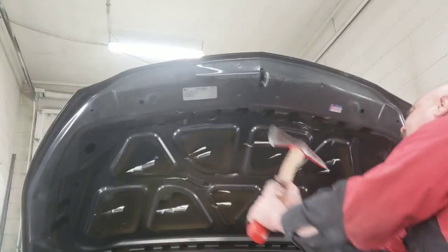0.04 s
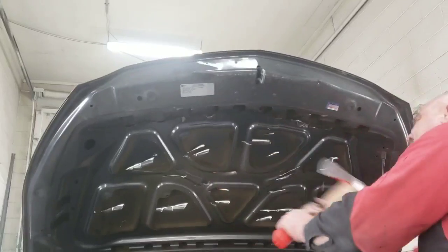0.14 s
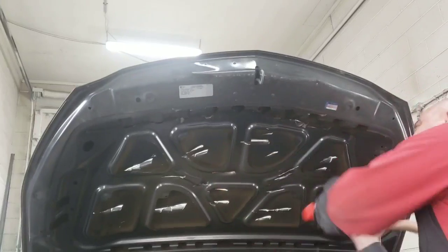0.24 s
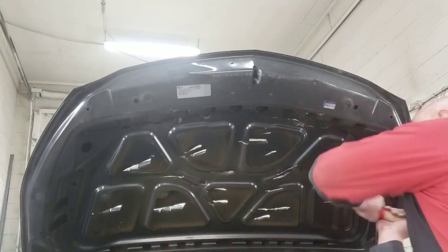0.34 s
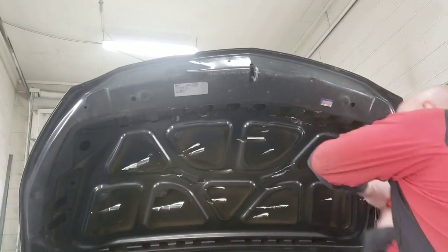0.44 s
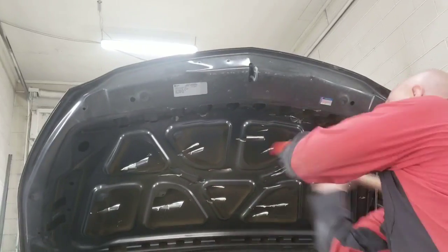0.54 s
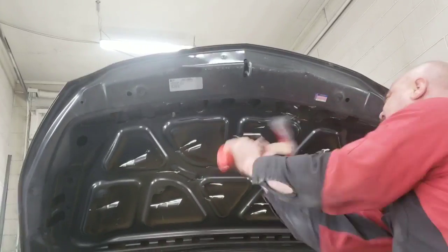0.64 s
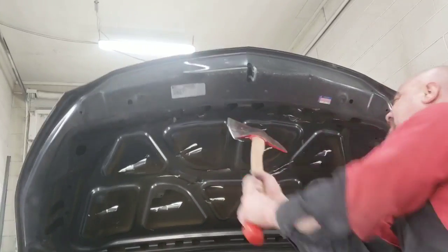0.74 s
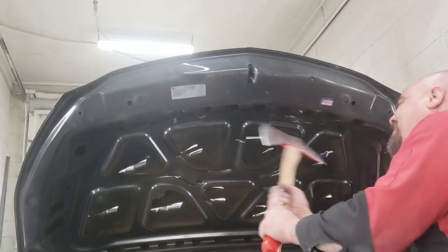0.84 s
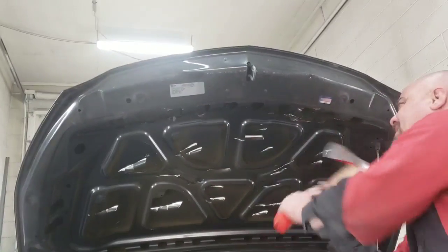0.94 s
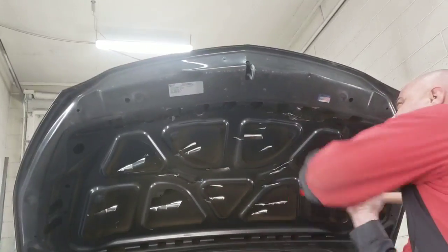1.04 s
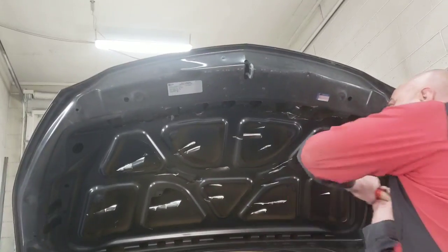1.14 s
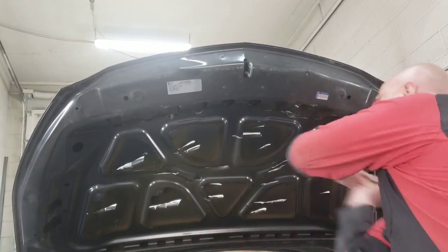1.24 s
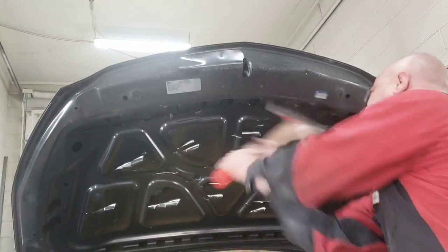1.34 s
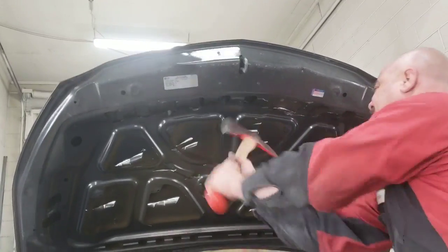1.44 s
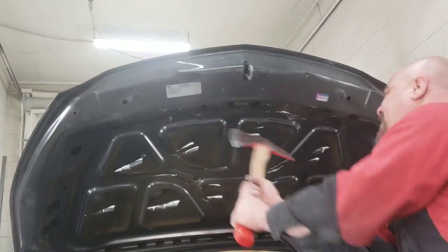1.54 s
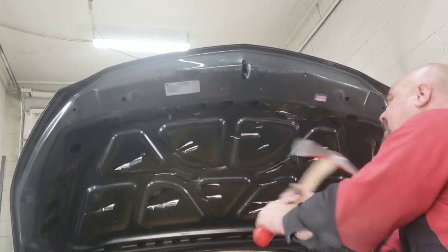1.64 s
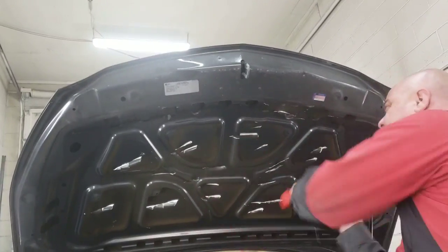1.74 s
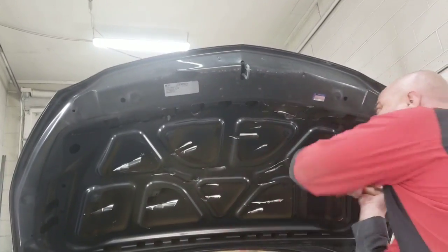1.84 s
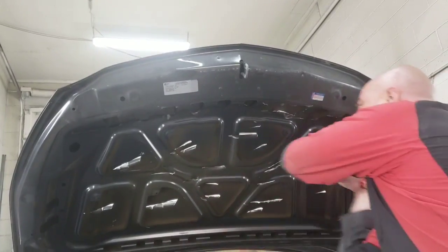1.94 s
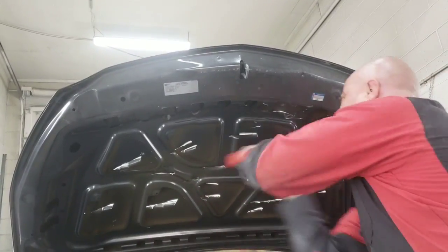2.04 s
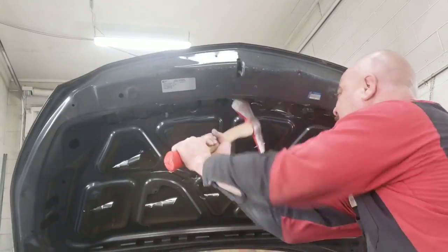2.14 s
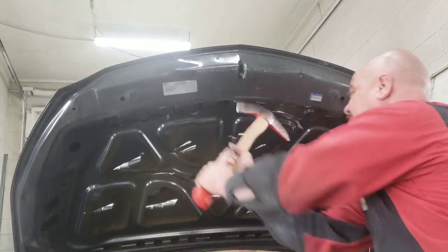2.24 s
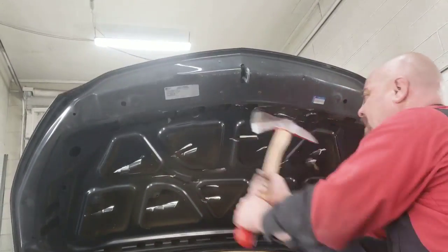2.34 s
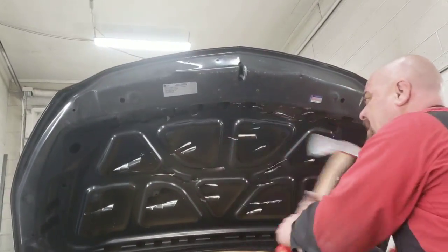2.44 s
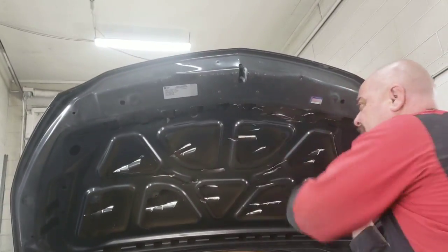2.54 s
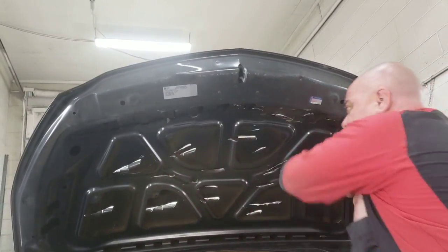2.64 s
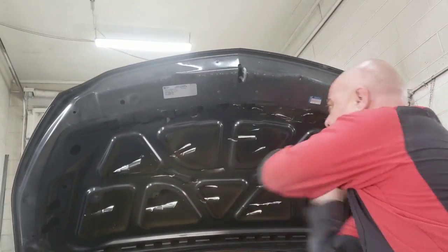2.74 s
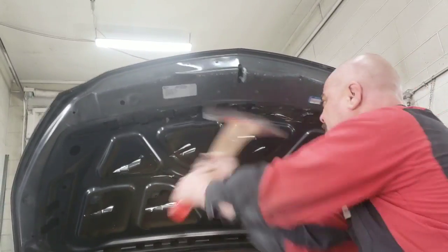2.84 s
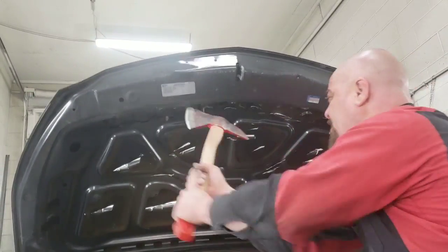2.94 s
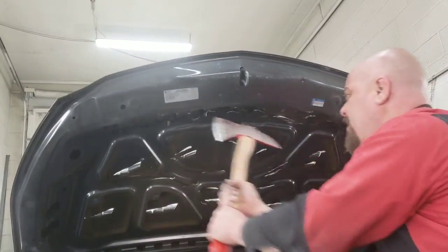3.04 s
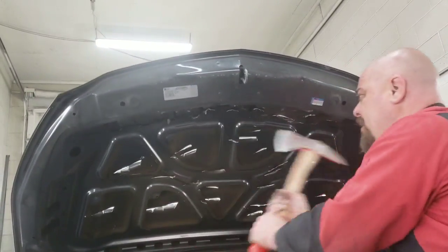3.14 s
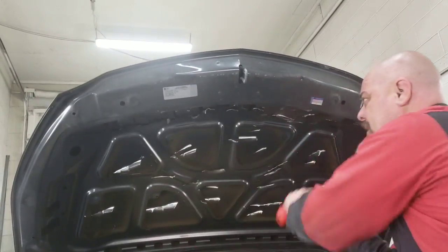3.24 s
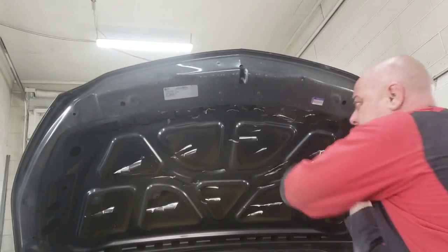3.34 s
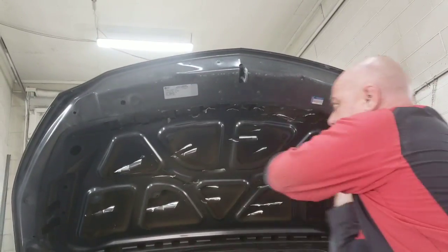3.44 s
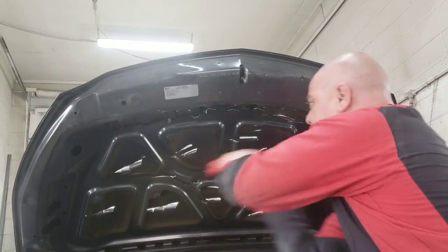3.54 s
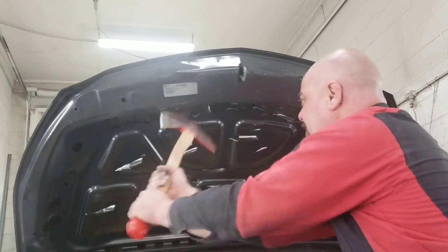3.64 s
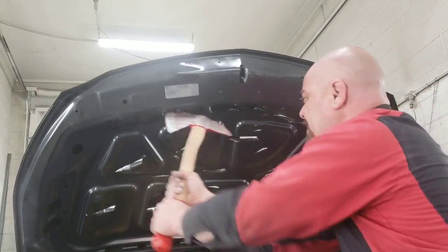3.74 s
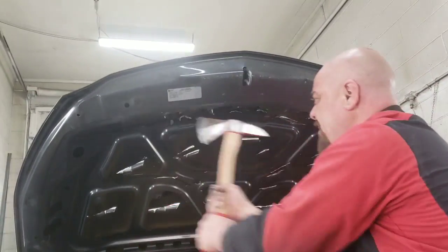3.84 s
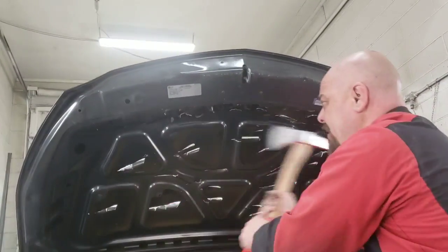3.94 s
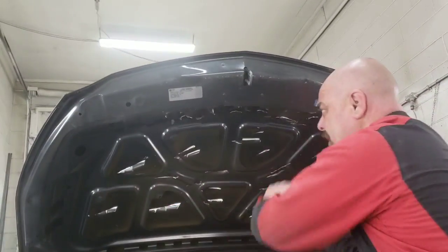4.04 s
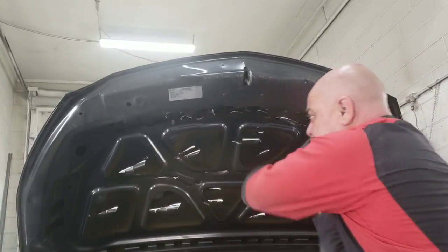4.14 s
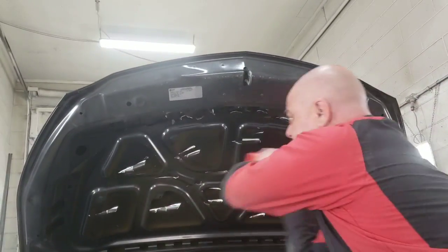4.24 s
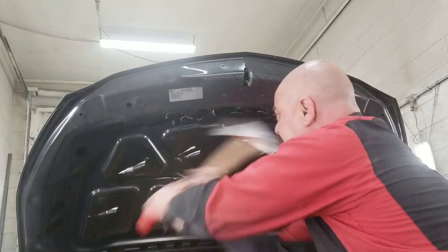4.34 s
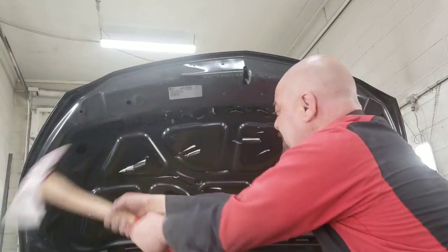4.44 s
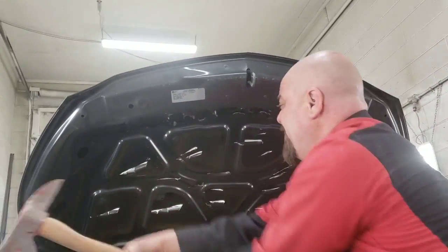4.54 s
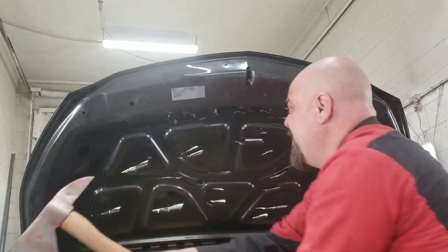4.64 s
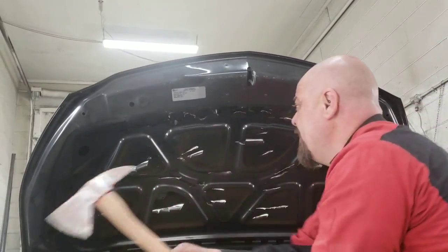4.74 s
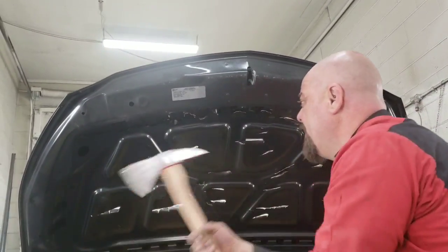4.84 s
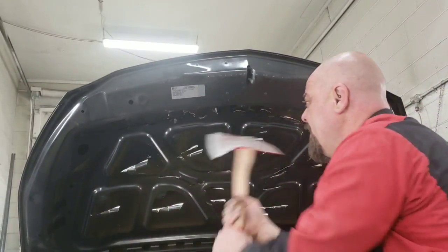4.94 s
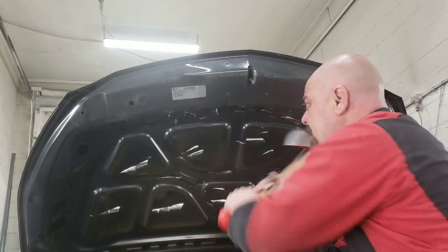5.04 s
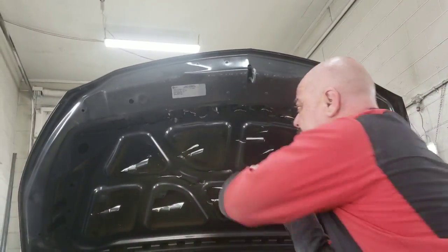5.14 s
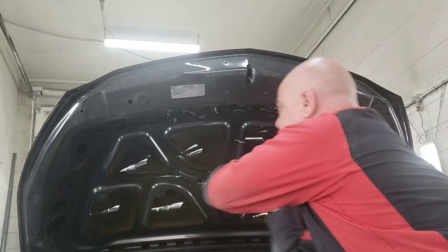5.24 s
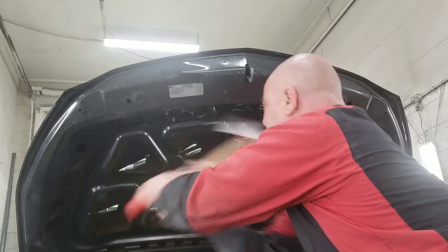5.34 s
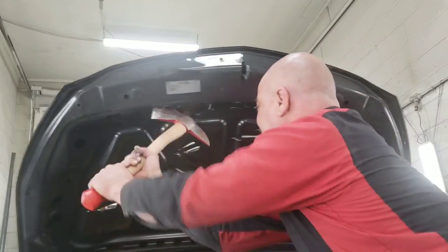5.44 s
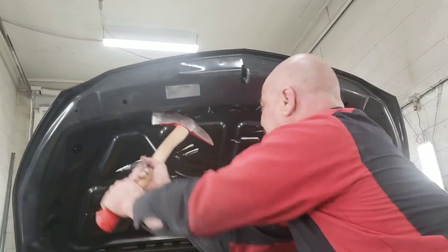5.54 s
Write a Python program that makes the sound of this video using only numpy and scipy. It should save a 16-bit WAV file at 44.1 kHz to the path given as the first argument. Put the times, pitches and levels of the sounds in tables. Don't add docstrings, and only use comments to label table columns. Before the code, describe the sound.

A hatchet repeatedly hits the steel hood of a car in a hard-walled workshop, heard close in wide stereo. The stretch opens inside a deep, booming blow already ringing, with a dull clang. The strongest blow crashes at 0.7 s with a quick hard rebound; a brighter one follows at 1.46 s and a boomier one at 2.2 s, then a faint scrape as the blade works free near 2.4 s. Sharper clangs land at 2.95 and 3.7 s, the latter with a strong rebound, and a softer clang with a ringing knock at 4.47 s. After a small creak around 4.9 s and slight sleeve rustle, the last, weakest blow comes at 5.48 s and is cut while ringing. Every hit is a thin bite, then a dense, noisy sheet-metal crash with short wavering panel notes, fading over about a second of room reverberation. Compression stretches the tails above a quiet hush.

```python
import sys
import numpy as np
from scipy import signal
from scipy.io import wavfile

SR = 44100
rng = np.random.default_rng(int(sys.argv[2]) if len(sys.argv) > 2 else 0)


def how_loud(loudness_db):
    steps = np.asarray(loudness_db, float) / 20
    return 10 ** steps


def file_out(sig):
    cols = np.atleast_2d(sig).T
    lim = np.clip(cols, -1, 1)
    pcm = np.round(lim * 32767).astype(np.int16)
    wavfile.write(sys.argv[1], SR, pcm)


N = 246914
LEAD = SR // 10
STEP = 16
DRIVE_LAG_S = 0.0055
SQUARE_FROM_S = 2.5

# (t/s, level/dB, boom/dB, clang/dB, edge/dB)
BLOWS = [
    (-.035, -7, -5.5, -8, -13.5),
    (0.7039, -2, -15, -8, -15.5),
    (1.4578, -5.5, -11.5, -9, -10),
    (2.21, -6.5, -10, -9, -11),
    (2.9533, -6.5, -13.5, -6, -5.5),
    (3.72, -5.5, -18.5, -3.5, -10),
    (4.4747, -8.5, -18, -5, -10.5),
    (5.4776, -12.5, -16.5, -6.5, -6),
]
# (t/s, level/dB, boom/dB, clang/dB, edge/dB)
KNOCKS = [
    (.012, -16, -9, -2.5, -31),
    (2.384, -28.5, -23.5, -11, -5.5),
    (2.4149, -22, -22, -15.5, -6.5),
    (3.743, -11, -7.5, -11, -4.5),
    (3.93, -28, -18, -7, -10),
    (0.7175, -9.5, -11, -10, -10),
    (4.4945, -15.5, -18, -2, -6),
    (5.4858, -14.5, -17, -5, -15),
]


def contacts_of():
    bites, drives = [], []
    for s, db, boom, clang, edge in BLOWS:
        slant_db = -5 * (s < SQUARE_FROM_S)
        bites.append((s, db - 3 + slant_db, boom, clang - 7, edge - 2, .0015))
        drives.append((s + DRIVE_LAG_S, db, boom, clang, edge, .0054))
    knocks = [(*row, .004) for row in KNOCKS]
    return bites + drives + knocks


def tearing(contacts, grain_db=7.0, size=SR // STEP // 6):
    out = np.zeros((len(contacts), (LEAD + N) // STEP + 1 + size))
    for row, (s, strength_db, *_, length_s) in zip(out, contacts):
        slip_db = grain_db * np.minimum(rng.exponential(1, size), 4)
        happens = rng.random(size) < .3
        age_s = np.arange(size) * STEP / SR
        slips = how_loud(slip_db) * happens * np.exp(-age_s / max(length_s, .001))
        slips[0] = 3.9
        at = round((LEAD + s * SR) / STEP)
        row[at:at + size] = how_loud(2 * strength_db) * slips / slips.sum()
    return out[:, :-size]


def at_hz(points, hz):
    table = np.array(points)
    return np.interp(np.log(hz), np.log(table[:, 0]), table[:, 1])


COLOUR_HZ = [170, 520, 2500, 11000]


def colour(contacts, hz):
    gains = []
    for s, strength, boom, clang, edge, tear in contacts:
        curve = list(zip(COLOUR_HZ, [boom + 10, clang + 3, 0, edge + 6]))
        gains.append(at_hz(curve, hz))
    return how_loud(gains)


def bands(rows, size):
    edges_hz = 30 * 2 ** np.arange(0, 9.2, 1 / 3)
    settle = 2000
    white = rng.standard_normal((2, rows, size + settle))
    for k, (low, high) in enumerate(zip(edges_hz, edges_hz[1:])):
        sos = signal.butter(3, [low, high], "band", fs=SR, output="sos")
        yield np.sqrt(low * high), signal.sosfilt(sos, white[k % 2])[:, settle:]


# (f/Hz, level/dB per Hz)
SHEET = [(18, -61), (30, -31.5), (499, -0.5), (801, -4.5), (889, -7.5), (1280, -13.5), (1540, -11.5),
         (2350, -16.5), (3580, -15.5), (6900, -18.5), (10800, -18), (12000, -6), (16000, -28)]
# (f/Hz, T60/s)
SHEET_T60 = [(40, 0.53), (120, 0.87), (300, 0.48), (600, 0.25), (2000, 0.21), (6000, 0.17), (15000, 0.15)]


def crash(contacts, slips):
    out = 0
    for hz, noise in bands(2, LEAD + N):
        luck_db = 1.62 * rng.standard_normal(len(contacts))
        share = colour(contacts, hz) * how_loud(at_hz(SHEET, hz) + 34.5 + luck_db)
        level = envelope(share ** 2 @ slips, hz, at_hz(SHEET_T60, hz))
        out = out + np.hypot(level, hush(hz)) * stereo(*noise, hz)
    return out


# (f/Hz, width/Hz, level/dB, T60/s)
RING = [(59.6, 17, -31.5, 0.38), (135.1, 7.6, -25, 0.84), (169.5, 4.5, -21, 0.35), (221.3, 34.6, -14, 0.58),
        (294, 28, -15, 0.62), (345.9, 11, -18, 0.47), (388.6, 31, -13.5, 0.34), (466.3, 54, -12, 0.66),
        (522.5, 24, -12, 0.17), (637, 16, -19.5, 0.18), (874, 15, -23, 0.035), (1069, 9.7, -23.5, 0.068),
        (1442, 250, -21.5, 0.039), (1676, 20, -27.5, .2), (1995, 45, -25.5, 0.12), (3300, 57, -30.5, .15),
        (3504, 23, -29, 0.17), (3735, 94, -28, 0.13), (5220, 190, -28, 0.13), (5150, 41, -43.5, 0.085),
        (7420, 150, -24.5, 0.052), (7960, 80, -24, 0.16), (10310, 80, -35.5, .15), (11540, 300, -19, 0.1),
        (12400, 200, -26.5, .12), (13700, 150, -31, .12), (14300, 50, -34, .15)]


def ringing(contacts, slips):
    out, white = 0, rng.standard_normal((2, LEAD + N))
    luck_db = 3.84 * rng.standard_normal((len(RING), len(contacts)))
    for (hz, width_hz, db, t60), luck in zip(RING, luck_db):
        r, w = np.exp(-np.pi * width_hz / SR), 2 * np.pi * hz / SR
        resonator = [1, 0.0067, -0.996, 1, -2 * r * np.cos(w), r * r]
        line = signal.sosfilt([resonator] * 2, white)
        share = colour(contacts, hz) * how_loud(db + 19.5 + luck)
        level = envelope(share ** 2 @ slips, hz, t60)
        out = out + level * stereo(*line / np.std(line), hz)
    return out


# (f/Hz, level/dB)
PANELS = [
    [(212, -16), (330, -15), (520, -37), (750, -20)],
    [(130, -21), (203, -18), (310, -16), (540, -10), (930, -14), (1430, -11.5), (2143, -22)],
    [(470, -9.5), (1550, -22.5)],
    [(135, -23.5), (440, -12.5), (720, -17), (2050, -19)],
    [(885, -19), (3300, -12)],
    [(295, -17.5), (655, -12), (1378, -11.5)],
    [(480, -17), (1460, -25), (2050, -22.5), (3650, -14)],
    [(1400, -15), (2060, -21)],
    [(1680, -24), (2900, -24)],
]


def panel_notes():
    notes = []
    for hit, panel in zip(BLOWS + KNOCKS[2:3], PANELS):
        for hz, db in panel:
            lag_s = np.clip(4.99 / hz, 0, 0.00898)
            notes.append((hit[0] + lag_s, hz, db, 0.2 * (500 / hz) ** 0.77))
    return notes


# (f/Hz, level/dB, T60/s)
BLADE = [(3374, -1, 0.021), (5180, -1.5, .06), (12050, 8.5, 0.012)]


def blade_notes():
    rung = [(s + DRIVE_LAG_S * (s < SQUARE_FROM_S), *rest) for s, *rest in BLOWS] + KNOCKS
    return [(s, hz, db + strength + edge, t60)
            for s, strength, boom, clang, edge in rung for hz, db, t60 in BLADE]


def pings():
    notes = panel_notes() + blade_notes()
    out, t = np.zeros((2, LEAD + N + SR // 2)), np.arange(SR // 2) / SR
    for (s, hz, db, t60), (turn, side) in zip(notes, rng.random((len(notes), 2))):
        fade = how_loud(db + 8 - 60 * t / t60) * np.minimum(t * hz / 2, 1)
        spread = np.arccos(np.clip(at_hz(LIKENESS, hz), 0, 1))
        phase = spread * np.array([[side], [-side]])
        at = LEAD + round(s * SR)
        out[:, at:at + len(t)] += fade * np.sin(2 * np.pi * (hz * t + turn) + phase)
    return out[:, :LEAD + N]


def store(power, seconds, rate=SR / STEP):
    keep = np.exp(-1 / (seconds * rate))
    return signal.lfilter([1 - keep], [1, -keep], power + 1e-18)


# (f/Hz, T60/s)
ROOM_T60 = [(40, 0.66), (90, 0.98), (160, 0.87), (450, 1.054), (1200, 1.097), (3000, 0.96), (6000, 0.74),
            (10000, 0.53), (15000, 0.39)]
# (f/Hz, level/dB)
ROOM_COLOUR = [(40, -25.5), (200, -2.5), (600, -0.5), (2000, -2), (6000, -0.5), (15000, -3.5)]


def envelope(fed, hz, t60, wet_db=-2.0, spread_cycles=0.91, build_s=0.0033, flutter_db=2.0):
    to_tau = 1 / (2 * np.log(1000))
    sheet = store(store(fed, spread_cycles / hz), t60 * to_tau)
    room = store(store(sheet, build_s), at_hz(ROOM_T60, hz) * to_tau)
    room_gain = how_loud(2 * (wet_db + at_hz(ROOM_COLOUR, hz)))
    beats = store(store(rng.standard_normal(len(fed)), 0.0065), 0.0065)
    flutter = how_loud(flutter_db * beats / np.std(beats))
    level = np.sqrt(sheet + room_gain * room) * flutter
    return np.interp(np.arange(LEAD + N) / STEP, np.arange(len(fed)), level)


# (f/Hz, likeness/1)
LIKENESS = [(30, .98), (150, .98), (300, .9), (600, .66), (1000, .15), (3000, .15), (12000, .05)]
# (f/Hz, level/dB)
BALANCE_DB = [(60, .5), (250, .6), (500, .3), (2000, .8), (8000, 1.2), (12000, 1.8)]


def stereo(mid, side, hz):
    alike = np.clip(at_hz(LIKENESS, hz), 0, 1)
    lean = how_loud(at_hz(BALANCE_DB, hz) / 2)
    common, apart = np.sqrt(1 + alike) * mid, np.sqrt(1 - alike) * side
    return np.array([lean * (common + apart), (common - apart) / lean])


# (t/s, level/dB, f/Hz, length/s)
RUSTLES = [(.45, -78, 12500, 0.04), (.52, -70, 4760, 0.022), (.52, -73, 12000, 0.025),
           (.6, -71, 10800, 0.023), (1.3, -64, 9840, 0.016), (3.629, -53, 11000, 0.0029),
           (4.33, -74.5, 11700, .08), (4.89, -38, 2000, 0.036), (5.2, -68, 8200, 0.018),
           (5.273, -71.5, 12100, .02), (5.45, -66, 5060, .015)]


def rustles():
    out, t = np.zeros(LEAD + N), (np.arange(LEAD + N) - LEAD) / SR
    grains = rng.standard_normal(LEAD + N) * rng.exponential(1, LEAD + N)
    for s, db, hz, length_s in RUSTLES:
        sos = signal.butter(2, [hz / 2.0, min(hz * 1.3, 20000)], "band", fs=SR, output="sos")
        near = slice(LEAD + round(s * SR), LEAD + round((s + 5 * length_s) * SR))
        age = (t[near] - s) / length_s
        swell = np.exp(-age) * np.minimum(8 * age, 1)
        out[near] += how_loud(db + 1) * signal.sosfilt(sos, grains[near] * swell)
    return out


# (f/Hz, level/dB per Hz re full-scale noise)
HUSH = [(30, -81), (100, -73), (300, -62), (700, -62), (1100, -82), (3000, -85.5), (6000, -89.5),
        (12000, -86), (16000, -87.5)]
# (t/s, level/dB)
STIR = [(0, 6.5), (1.3, -5.5), (2.7, -1.5), (4.1, -5), (4.5, 1.5), (5.6, 2)]


def hush(hz):
    stir_db = np.interp((np.arange(LEAD + N) - LEAD) / SR, *np.transpose(STIR))
    return how_loud(at_hz(HUSH, hz) + 15.5 + stir_db * min(hz / 8000, 1))


def gain_control(x, limit_db=-26, share=0.49, release_db_s=22, attack_s=0.00029, sense_s=0.0032,
                 ahead_s=.0022):
    level_db = 10 * np.log10(store(np.mean(x ** 2, axis=0), sense_s, SR))
    cut_db = share * np.maximum(level_db - limit_db, 0)
    time = np.arange(len(cut_db))
    climb_db = release_db_s * time / SR
    held_db = np.maximum.accumulate(cut_db + climb_db) - climb_db
    held_db = store(held_db, attack_s, SR)
    return x * how_loud(-np.interp(time + ahead_s * SR, time, held_db))


def scene():
    contacts = contacts_of()
    slips = tearing(contacts)
    air = crash(contacts, slips) + ringing(contacts, slips) + pings() + rustles()
    return gain_control(air)[:, LEAD:]


def band_limit(x):
    return signal.sosfilt(signal.butter(12, 16820, fs=SR, output="sos"), x)


def record(dry):
    top = signal.cheby2(10, 36, 15950, fs=SR, output="sos")
    rounded = 1.24 * np.tanh(dry / 0.9)
    return band_limit(signal.sosfilt(top, rounded))


dry = scene()
out = record(dry)
file_out(out)
```